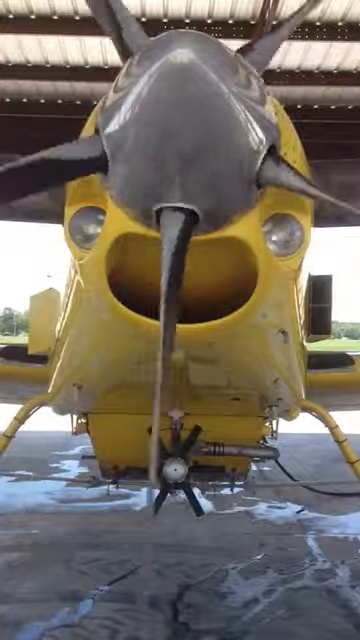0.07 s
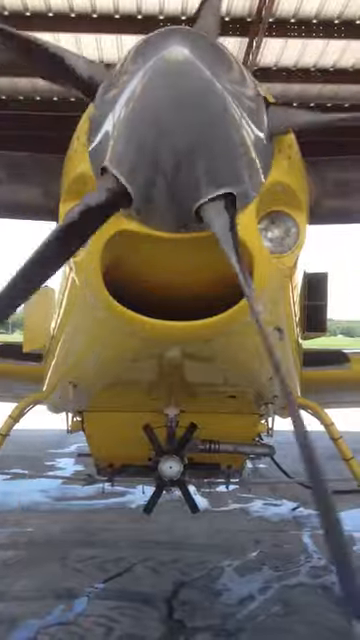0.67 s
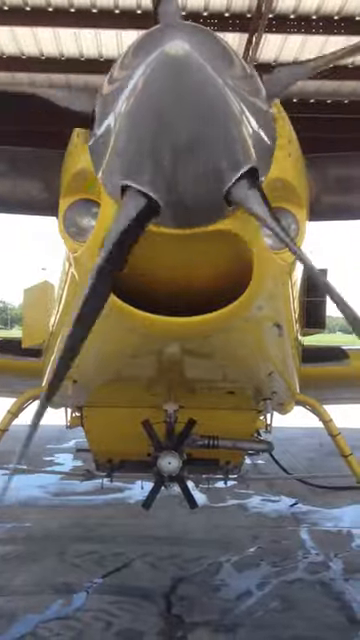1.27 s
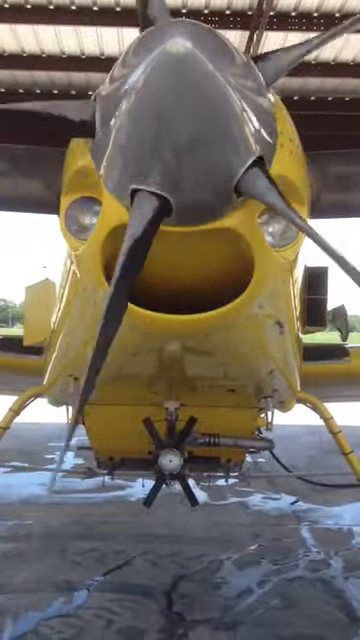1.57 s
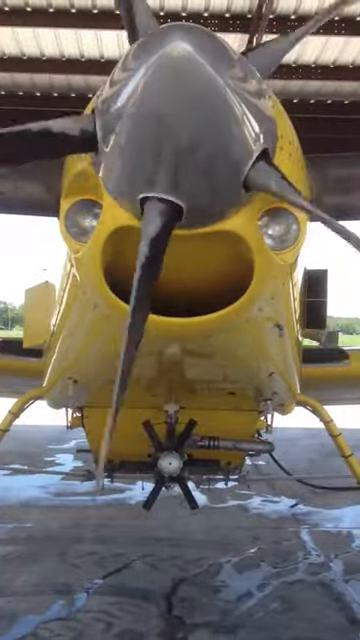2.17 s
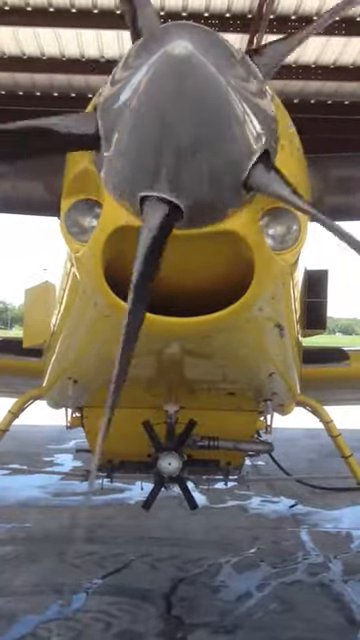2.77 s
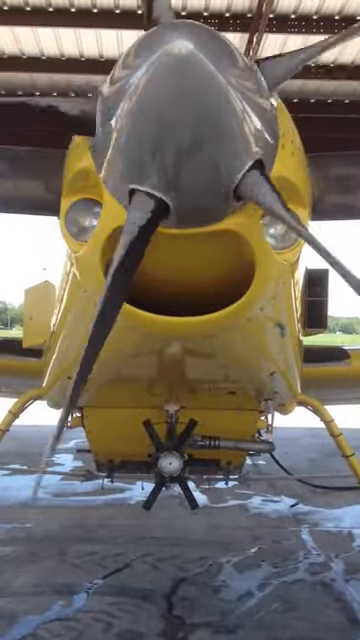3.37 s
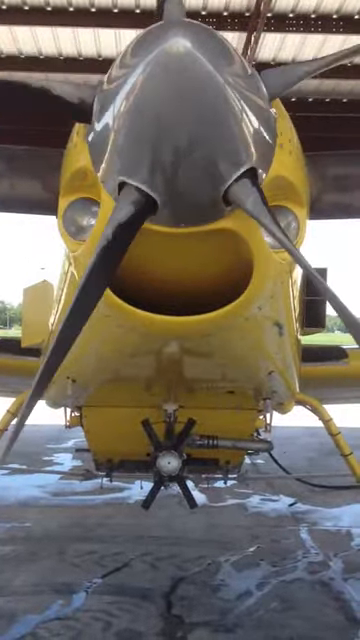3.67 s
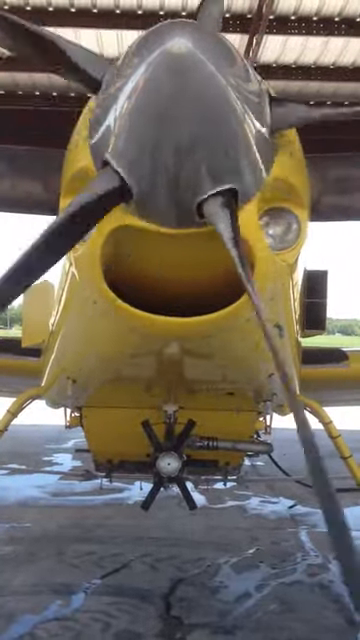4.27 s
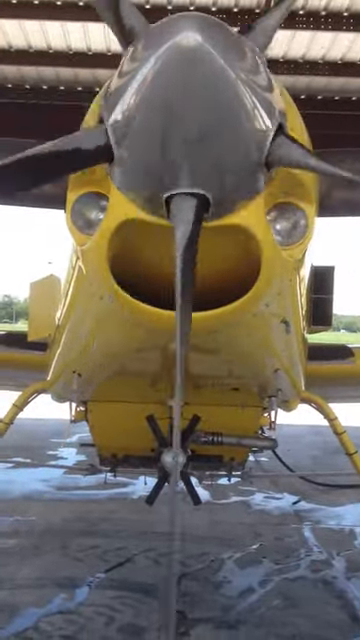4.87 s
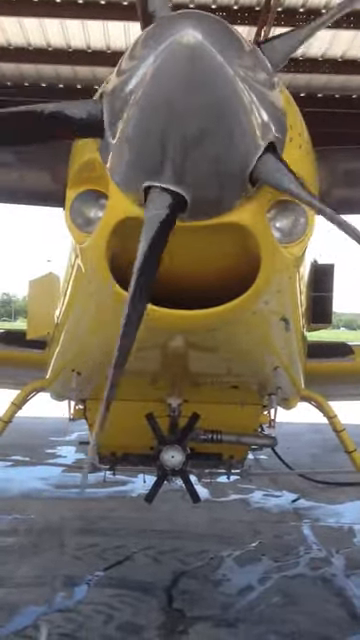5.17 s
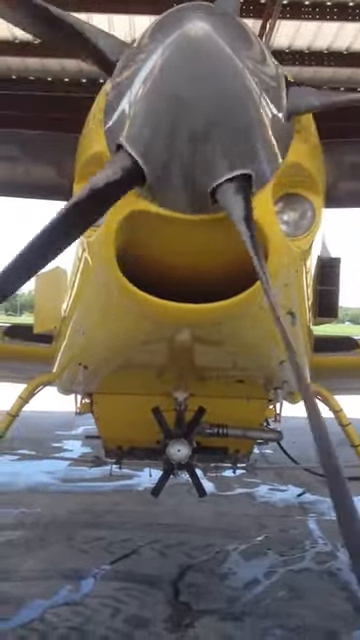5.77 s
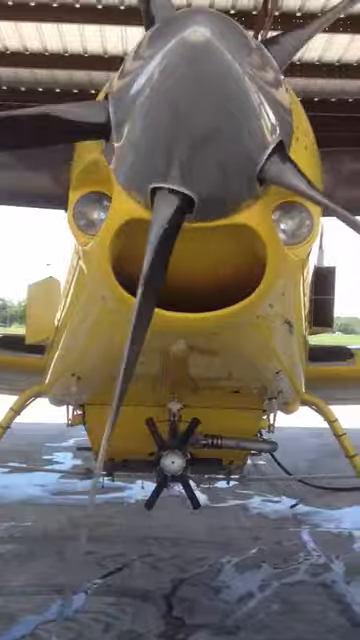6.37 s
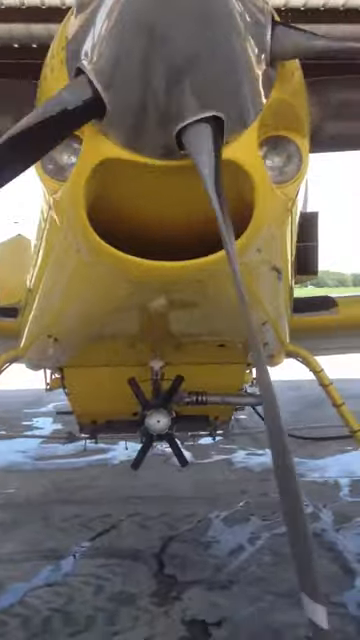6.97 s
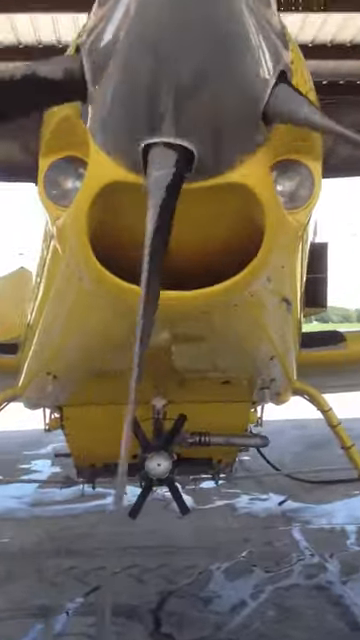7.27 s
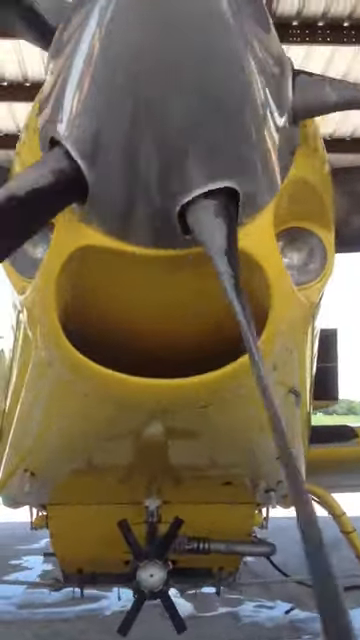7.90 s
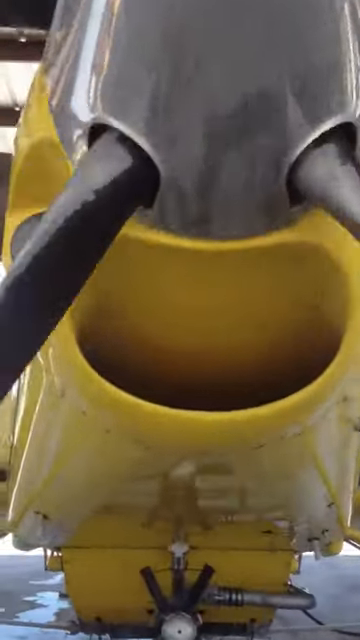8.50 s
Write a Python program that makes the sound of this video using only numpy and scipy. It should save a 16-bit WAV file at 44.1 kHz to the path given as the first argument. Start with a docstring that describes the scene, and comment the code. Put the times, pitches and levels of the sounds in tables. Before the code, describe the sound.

Gusts thump on the microphone as an aircraft turbine coasts down, whistling lower and fainter over a fading hiss.

```python
"""Under a hangar roof, a turboprop engine winds down, heard from just in front of its propeller.
The blades of its compressor (the fan that squeezes air in) sing tones that glide down as it slows,
over the rush of air through the intake and exhaust. Late on, the microphone moves toward the intake.
Puffs of wind hit this single microphone; the hardest make its automatic volume dip and creep back."""
import sys
import numpy as np
from scipy.fft import rfft, irfft, next_fast_len
from scipy.io import wavfile
from scipy.ndimage import uniform_filter1d, map_coordinates

SR = 44100
rng = np.random.default_rng(int(sys.argv[2]) if len(sys.argv) > 2 else 0)


def master(y):
    """Save y as 16-bit WAV."""
    cut = np.clip(np.atleast_2d(y).T, -1, 1)
    pcm = np.round(cut * 32767)  # scale
    wavfile.write(sys.argv[1], SR, pcm.astype(np.int16))


N = 385434
SHAFT_HZ = 287.57  # turns of the engine shaft per second, at the start


def compressor():
    """Spinning blades chop the air, making tones at multiples of the shaft's turning rate."""
    angle = 2 * np.pi * np.cumsum(SHAFT_HZ * shaft_speed()) / SR
    return whine(angle) + whistle(angle) + weak_tones(angle) + haze(angle)


def shaft_speed(air_drag=0.07989, bearing_friction=0.001868):
    """The shaft coasts, slowed by the air and its bearings; 1 is its starting speed."""
    t = clock()
    return 1 / (1 + air_drag * t + bearing_friction * t ** 2)


def whine(angle):
    """The first row of blades sings the main tone, 9 waves for each turn of the shaft."""
    # loudness before dips and fades: (time [s], level [dB])
    levels = [(0, -18), (0.11, -27.5), (0.26, -14.5), (0.44, -11), (0.56, -16.5), (1.04, -16),
              (1.35, -24.5), (3.0, -26.5), (3.75, -28.5), (4.45, -39), (5.1, -22.5), (5.85, -28),
              (6.6, -39), (8.74, -45)]
    # dips where echoes cancel the gliding pitch: (time [s], depth [dB], half length [s])
    dips = [(0.285, 15, 0.0095), (0.796, 13, 0.07), (1.186, 12, 0.085), (2.213, 11, 0.055),
            (2.78, 7.5, 0.081), (3.197, 14, 0.11), (3.438, 14.5, 0.08), (3.97, 7.5, 0.098),
            (4.565, 7, 0.079), (5.65, 13, 0.11), (6.45, 14, 0.086), (7.85, 12, .15)]
    db = curves(levels)[0] - sum(depth * bump(clock(), s, length) for s, depth, length in dips)
    return amp(db) * fading(depth_db=2.2, rate=22) * tone(9 * angle, flutter=0.18, flutter_rate=35)


def whistle(angle):
    """The second row of blades sings higher, 22 waves for each turn."""
    # loudness of the tone: (time [s], level [dB])
    levels = [(0, -33.5), (0.45, -35), (0.7, -23.5), (1.15, -27.5), (1.6, -28), (1.92, -36), (2.17, -23),
              (2.63, -41.5), (3.3, -39.5), (3.85, -54.5), (4.45, -44), (5.3, -61), (8.74, -53)]
    return amp(curves(levels)[0]) * tone(22 * angle, flutter=0.46, flutter_rate=55)


def weak_tones(angle):
    """The two rows add faint higher tones, each swelling in one stretch of its glide."""
    # waves per turn: (base level [dB], swell [dB], swell centre [Hz], swell width [Hz])
    blade_tones = {18: (-36, 2.5, 4598, 150), 27: (-49, 6.5, 7250, 500), 31: (-49.5, 8, 7750, 801),
                   32: (-55, 7.5, 7850, 310), 36: (-61.5, 11, 7000, 150), 40: (-57.5, 5, 7998, 150),
                   45: (-56, 8.5, 10800, 1200), 50: (-68, 4, 11000, 1999), 54: (-58.5, 9, 12500, 2503),
                   58: (-69, 7, 14000, 1500), 63: (-70, 5, 12000, 1200)}
    t, speed = clock(), shaft_speed()[::20]
    out = np.zeros(N)
    for multiple, (base_db, swell_db, centre_hz, width_hz) in blade_tones.items():
        hz = multiple * SHAFT_HZ * speed
        level = amp(base_db + swell_db * bump(hz, centre_hz, width_hz)) * duct(hz) * speed ** 1.2
        echo_fades = fading(depth_db=1.8, rate=7)  # each tone fades against its own echoes
        wave = tone(multiple * angle, flutter=0.69, flutter_rate=34)
        out += np.interp(t, t[::20], level) * echo_fades * wave
    return out


def duct(hz):
    """The intake is a tube that lets some pitches out better than others."""
    # how well a tone gets out: (pitch [Hz], gain [dB])
    passage = [(2900, -13), (3450, -24.5), (3900, -4), (5000, 1), (8100, 0), (8800, -7), (12500, -8),
               (15300, -18)]
    # pitches where the tube rings and a tone flares: (pitch [Hz], width [Hz], boost [dB])
    rings = [(3970, 110, 4), (4330, 50, 4), (4550, 70, 4), (5490, 70, 4.5), (6060, 100, 6), (6590, 83, 6),
             (8080, 180, 8)]
    return gain_at(passage, hz) * amp(sum(db * bump(hz, centre, width) for centre, width, db in rings))


def haze(angle):
    """Blades chop swirling air into noise just above the whine, and more faintly an octave up."""
    # loudness of the lower band: (time [s], level [dB])
    levels = [(0, -31), (2.27, -29.5), (3.16, -37), (5.4, -35.5), (6.5, -40.5), (8.74, -39)]
    lower = narrow_noise(9.4 * angle, width_hz=133)
    upper = amp(-10.5) * narrow_noise(18.3 * angle, width_hz=150)
    return amp(curves(levels)[0]) * (lower + upper)


def airflow():
    """Air rushes through the engine's ringing tubes, each band of noise a little unsteady."""
    # tone colour of each band, from low to high: (pitch [Hz], relative level [dB])
    roar_shape = [(250, -11.5), (350, -7), (405, -5), (450, -7.5), (505, 2.5), (585, -5), (690, 1),
                  (760, -2), (840, 2), (940, -11.5), (1090, -7), (1220, -12.5), (1450, -13.5)]
    rush_shape = [(900, -19), (1150, -1), (1450, -8), (1780, 3), (2050, -4.5), (2480, 2), (2850, -4.5),
                  (3500, -6.5), (4200, -48)]
    ring_shape = [(4200, -34), (4430, -2), (4530, 2), (4630, -7), (4850, -29)]
    hiss_shape = [(3000, -58), (3700, -2), (4200, -2.5), (4500, -2), (5100, -3), (5900, -2), (6800, -9.5),
                  (8000, -17), (9000, -34)]
    edge_shape = [(6000, -21), (7000, -3), (7900, 2.5), (8500, -4.5), (9500, -26)]
    fizz_shape = [(7000, -15), (8800, -1.5), (10500, 1), (12200, -2.5), (13600, -2.5), (14500, -10),
                  (15300, -9)]
    # loudness rules: (starting level [dB], exponent of shaft speed, boost when close [dB])
    roar_rule = (-35.3, 1.7, 0.8)
    rush_rule = (-31.4, 1.84, 1)
    hiss_rule = (-35, 1.62, 4.2)
    fizz_rule = (-50.6, 2.1, 1.3)
    speed = shaft_speed()
    surge = wobble(7)
    roar = amp(air_db(roar_rule) + 0.92 * wobble(12)) * noise(roar_shape)
    rush = amp(air_db(rush_rule) + 0.24 * wobble(14)) * noise(rush_shape)
    # the intake rings at one narrow pitch; the sharp edge of the hiss dulls as the blades slow
    bright = noise(hiss_shape) + amp(-3) * speed * noise(ring_shape)
    bright += amp(-9.5) * speed ** 2 * noise(edge_shape)
    hiss = amp(air_db(hiss_rule) + 0.68 * surge + 1.1 * wobble(30)) * bright
    fizz = amp(air_db(fizz_rule) + 0.3 * surge + 0.6 * wobble(18)) * noise(fizz_shape)
    return hangar(roar + rush + hiss + fizz, echo_db=-18)


def air_db(rule, approach_s=(7.2, 8.2)):
    """Air noise falls as the shaft slows and grows as the microphone comes closer."""
    start_db, exponent, close_db = rule
    closeness = np.interp(clock(), approach_s, [0, 1])
    return start_db + exponent * 20 * np.log10(shaft_speed()) + close_db * closeness


def draught():
    """A lumpy breeze rumbles on the microphone and sounds higher as it blows harder."""
    # strength of the breeze: (time [s], relative level [dB])
    levels = [(0, -37.5), (0.8, -33.5), (1.42, -36), (1.56, -29), (2.05, -31), (2.26, -34), (2.8, -28.5),
              (4.65, -34), (5.85, -38.5), (6.31, -30.5), (6.8, -31), (7.56, -26.5), (7.68, -37),
              (7.88, -35.5), (8.17, -22), (8.42, -28), (8.62, -22), (8.74, -30)]
    # tone colours of the breeze: (pitch [Hz], relative level [dB])
    rumble_shape = [(25, -55), (60, -17.5), (110, -4.5), (170, 2), (230, 0), (320, -11), (500, -18),
                    (1000, -22.5)]
    flutter_shape = [(120, -11.5), (200, 1), (270, -1), (350, 0), (460, -14), (700, -34)]
    db = curves(levels)[0] + 2 * wobble(34)
    rumble = amp(db - 3) * noise(rumble_shape)
    flutter = amp(1.72 * (db + 24.5) - 26) * noise(flutter_shape)
    return rumble + flutter


def puffs(swirls_per_s=430, width_s=0.00052, scatter_db=6, sharpening=0.33):
    """Tiny swirls of air crowd into sudden puffs; a faster swirl is both stronger and shorter."""
    # puffs on the microphone: (middle time [s], relative level [dB], length [s])
    gusts = [(0.469, -12.5, 0.04), (0.593, -12, 0.051), (0.693, -13.5, 0.028), (0.787, -11, 0.052),
             (0.882, -12, 0.027), (0.955, -14.5, 0.021), (1.009, -13, 0.018), (1.079, -16, 0.052),
             (1.207, -19, 0.05), (2.665, -13, 0.03), (2.745, -16.5, 0.048), (2.85, -13, 0.068),
             (2.956, -11.5, 0.027), (3.043, -16, 0.072), (3.156, -15.5, 0.031), (3.271, -14, 0.058),
             (3.416, -15.5, 0.074), (3.538, -16, 0.046), (3.642, -14.5, 0.06), (3.804, -15, 0.063),
             (3.912, -11.5, 0.039), (4.002, -13.5, 0.045), (4.156, -15.5, 0.11), (4.326, -16, 0.057),
             (4.453, -14, .046), (4.585, -16.5, 0.046), (6.294, -16, 0.053), (6.381, -14, 0.053),
             (6.531, -15, .038), (6.599, -17.5, 0.041), (6.956, -13.5, 0.057), (7.052, -14, 0.059),
             (7.143, -14, 0.062), (7.223, -14, 0.044), (7.306, -12.5, 0.05), (7.369, -8.5, 0.037),
             (7.427, -11, .056), (7.488, -6, 0.015), (7.55, -10.5, 0.049), (8.473, -20, 0.029),
             (8.584, -23, 0.042), (8.651, -16.5, 0.022)]
    starts = np.arange(0, N / SR, 1 / swirls_per_s)
    grid = clock()[::20]
    power = sum(amp(db) ** 2 / (1 + np.abs(2 * (grid - s) / length) ** 10) for s, db, length in gusts)
    jitter, strength, sign = rng.standard_normal((len(starts), 3)).T
    times = starts + 0.5 * jitter / swirls_per_s
    size = np.sqrt(np.interp(times, grid, power)) * amp(scatter_db * strength) + 1e-6
    width = np.clip(width_s * (size / amp(-8.5)) ** -sharpening, 0.00027, 0.0012)
    pressure = pulses(times, np.sign(sign) * size, width)
    # each puff keeps its own energy, however its swirls fall
    smooth = lambda p: np.abs(uniform_filter1d(uniform_filter1d(p, size=700), size=700)) + 1e-7
    return pressure * np.sqrt(smooth(np.interp(clock(), grid, power)) / smooth(pressure ** 2))


def slaps(width_s=0.00032, rebound_s=0.0013):
    """A hard swirl of air pushes the microphone sharply, then pulls back more softly."""
    # the hardest single swirls: (time [s], relative peak [dB])
    hits = [(0.452, -6.5), (0.616, 0), (0.784, -3), (0.889, 3.5), (1.222, -3.5), (2.426, -12), (2.757, 0),
            (2.829, -2.5), (2.861, -4), (3.006, -7.5), (3.053, -7.5), (3.116, -6), (3.16, -0.5),
            (3.325, -9.5), (3.443, -2), (3.673, -8), (3.824, -1), (3.913, 4), (4.214, -3.5), (4.469, -6.5),
            (6.358, -6), (6.522, -8), (6.582, -7), (6.93, -8), (6.974, 5.5), (7.067, -6), (7.245, -3),
            (7.288, -5.5), (7.323, -2), (7.379, 4.5), (7.411, 2.5), (7.548, -2)]
    times, db = np.transpose(hits)
    sign, spread = rng.standard_normal((len(times), 2)).T
    size = np.sign(sign) * amp(db + 5.5)
    width = width_s * amp(1.1 * spread)
    return pulses(np.r_[times, times + rebound_s], np.r_[size, -0.3 * size], np.r_[width, 2 * width])


def pulses(times, size, width_s):
    """Bell-shaped pushes of air lose their bass in the microphone's small opening."""
    # what the opening lets through: (pitch [Hz], gain [dB])
    opening = [(20, -65), (60, -31.5), (110, -9), (170, 2), (300, 0.5), (1000, -1.5), (3000, -0.5),
               (6000, 1)]
    lag = np.arange(-SR // 200, SR // 200)
    bells = size[:, None] * np.hanning(len(lag)) / (1 + (lag / SR / width_s[:, None]) ** 2) ** 1.4
    index = np.clip((times * SR).astype(int)[:, None] + lag, 0, N - 1)
    pressure = np.bincount(index.ravel(), bells.ravel(), N)
    return filtered(pressure, lambda hz: causal(gain_at(opening, hz)))


def hangar(x, echo_db, count=8):
    """Floor, walls and roof send back weak, late copies that colour the sound."""
    delays = rng.integers(SR // 200, SR // 22, count)
    echoes = sum(np.pad(x, (delay, 0))[:N] for delay in delays)
    return (x + amp(echo_db) * echoes) / np.sqrt(1 + count * amp(echo_db) ** 2)


def tone(phase, flutter, flutter_rate):
    """A pure tone whose loudness and timing flutter in moving air."""
    wave = (1 + flutter * wobble(flutter_rate)) * np.sin(phase)
    return unit(wave + flutter * wobble(flutter_rate) * np.cos(phase))


def noise(spectrum):
    """Noise with the given tone colour."""
    return unit(filtered(rng.standard_normal(N), lambda hz: gain_at(spectrum, hz)))


def narrow_noise(phase, width_hz):
    """A thin band of noise that rides on a gliding pitch."""
    a, b = (filtered(rng.standard_normal(N), lambda hz: 1 / (1 + (hz / width_hz) ** 2)) for _ in range(2))
    return unit(a * np.sin(phase) + b * np.cos(phase))


def fading(depth_db, rate):
    """A gain that swells and fades at random."""
    return unit(amp(depth_db * wobble(rate)))


def wobble(rate):
    """A smooth curve through `rate` random values a second."""
    t = clock()
    values = rng.standard_normal(int(N * rate / SR) + 4)
    return np.interp(t, t[::32], map_coordinates(values, [t[::32] * rate]))


def bump(x, centre, width):
    """A bell shape of height 1 around a centre."""
    return np.exp(-np.minimum(((x - centre) / width) ** 2, 20))


def curves(rows):
    """Join a table's timed points with straight lines, one value per sample."""
    times, *columns = np.transpose(rows)
    return [np.interp(clock(), times, column) for column in columns]


def gain_at(points, hz):
    """Read a gain from (pitch [Hz], level [dB]) points, falling away past both ends."""
    pitch, db = np.transpose(points)
    pitch = np.r_[pitch[0] / 2, pitch, pitch[-1] * 2]
    db = np.r_[db[0] - 20, db, db[-1] - 20]
    return amp(np.interp(np.log(hz + 1), np.log(pitch), db, left=-120, right=-120))


def filtered(x, response):
    """Turn each pitch in x up or down by response(hz)."""
    size = 2 * next_fast_len(N // 2 + SR // 4)
    return irfft(rfft(x, size) * response(np.fft.rfftfreq(size, 1 / SR)), size)[:N]


def causal(gain):
    """A filter with this gain that rings only after a push, never before (minimum phase)."""
    cepstrum = irfft(np.log(gain))
    half = len(cepstrum) // 2
    return np.exp(rfft(np.r_[cepstrum[0], 2 * cepstrum[1:half]], 2 * half))


def amp(db):
    """Turn decibels into a gain, a number to multiply by."""
    return 10 ** (np.asarray(db) / 20)


def unit(x):
    """Scale to an average strength (rms) of 1."""
    return x / np.sqrt(np.mean(x ** 2) + 1e-20)


def clock():
    """The time of every sample, in seconds."""
    return np.arange(N) / SR


def scene():
    """Engine and wind meet at one microphone that feeds both channels."""
    engine = compressor() + airflow()
    wind = draught() + amp(-0.28) * puffs() + slaps()
    return np.array([engine + wind] * 2)


def automatic_volume(x, threshold_db, recovery_db_per_s):
    """Loud moments pull the volume down at once; then it creeps back."""
    level_db = 10 * np.log10(np.abs(uniform_filter1d(x ** 2, size=700, origin=200)) + 1e-12)
    ramp = recovery_db_per_s * clock()
    cut_db = np.maximum.accumulate(np.maximum(level_db - threshold_db, 0) + ramp) - ramp
    return x * amp(-cut_db)


def record(dry, ceiling=0.74, top_hz=15350):
    """The microphone turns loud moments down, rounds off peaks and drops the highest treble."""
    x = automatic_volume(dry[0], threshold_db=-11, recovery_db_per_s=3.5)
    x = x / (1 + (x / ceiling) ** 6) ** (1 / 6)
    x = filtered(x, lambda hz: hz < top_hz)
    return np.array([x, x])


dry = scene()
out = record(dry)
master(out)
```